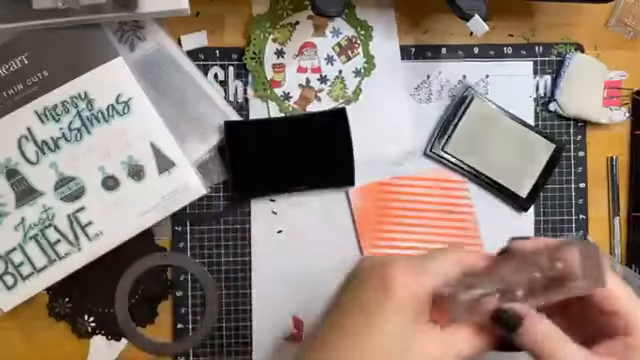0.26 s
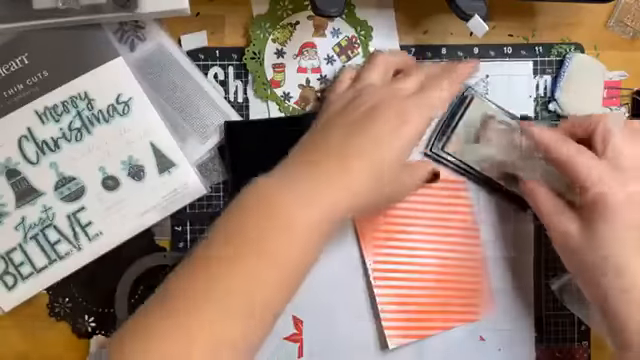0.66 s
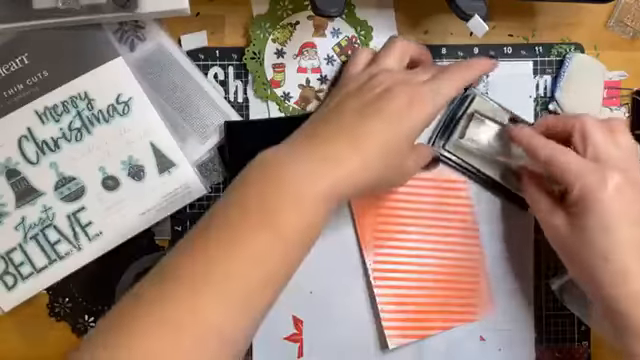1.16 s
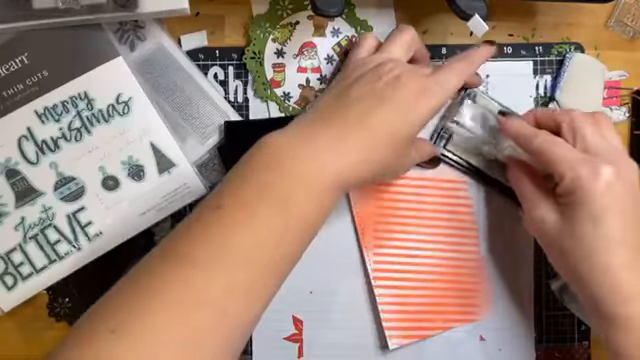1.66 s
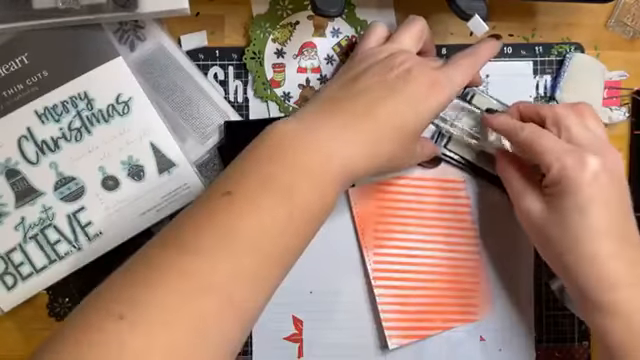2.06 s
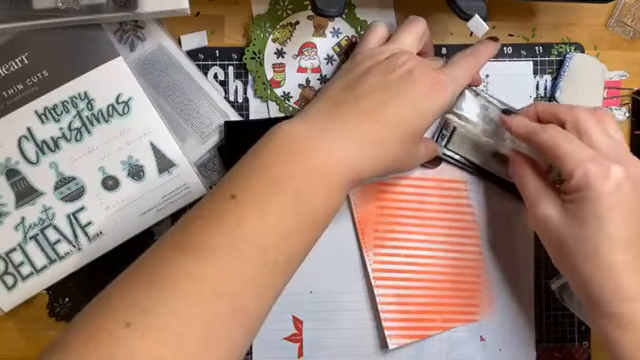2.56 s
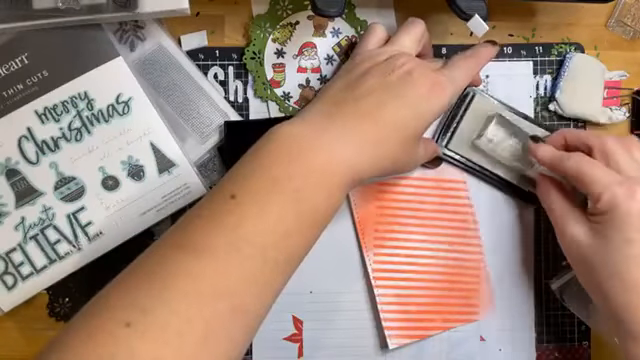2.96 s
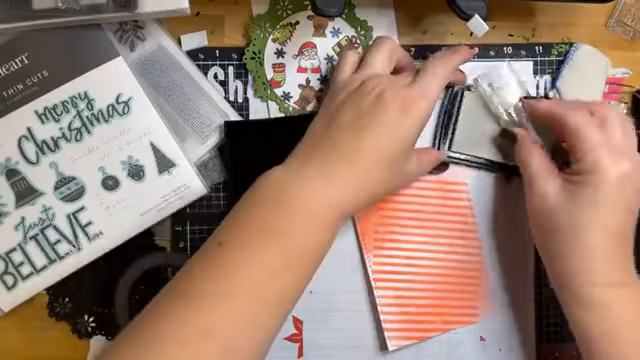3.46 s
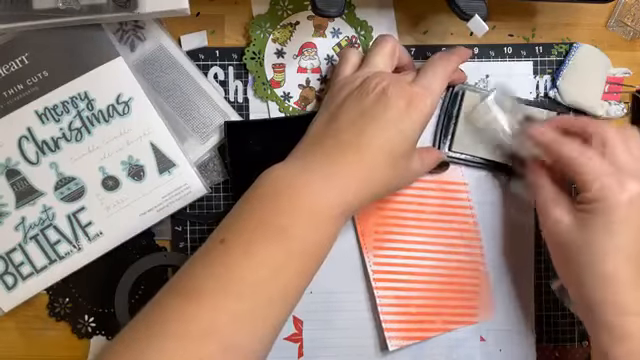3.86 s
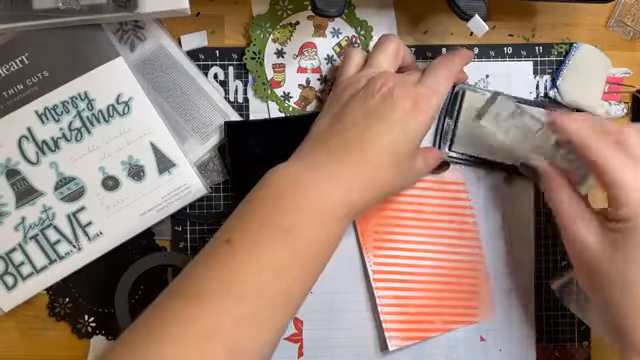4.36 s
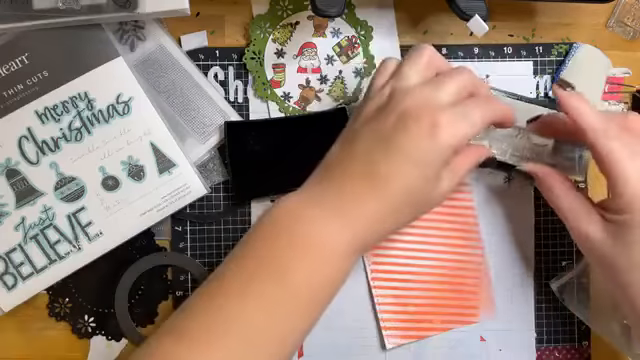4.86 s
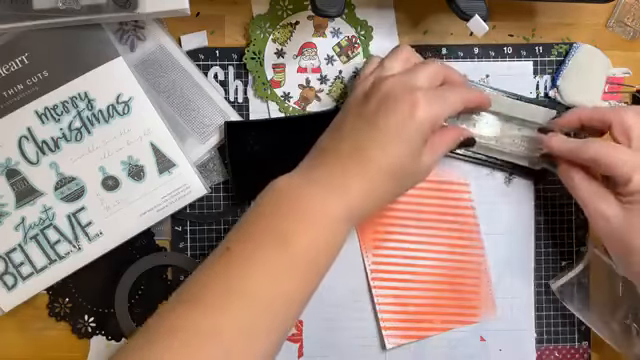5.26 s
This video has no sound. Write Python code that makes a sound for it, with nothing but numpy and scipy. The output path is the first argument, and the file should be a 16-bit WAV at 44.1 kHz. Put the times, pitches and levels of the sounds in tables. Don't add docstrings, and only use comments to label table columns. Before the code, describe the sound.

A fingernail or ring clinks on an acrylic block, hands rustle barely audibly, then the block is dabbed on an ink pad: a loud click, several muffled pressing thuds, then a livelier run of crisp taps with wooden knocks. A small microphone stands on the same table, picking up its boomy resonance and short indoor reflections. It ends in faint low room tone.

```python
import sys
import numpy as np
from scipy import signal
from scipy.io import wavfile
from scipy.ndimage import uniform_filter1d

SR = 44100
rng = np.random.default_rng(int(sys.argv[2]) if len(sys.argv) > 2 else 0)


def undo_db(level):
    steps = np.asarray(level, float) / 20
    return 10 ** steps


def persist_wave(psi):
    counts = np.round(np.clip(psi, -1, 1) * 32767).astype(np.int16)
    wavfile.write(sys.argv[1], SR, np.atleast_2d(counts).T)


N = 243640

# time in s, click in dB, brightness in dB, knock into the table top in dB.
TAPS = [(1.697, -16.5, -0.5, -31), (1.867, -25.5, 2, -37), (2.149, -46.5, -45, -54),
        (2.199, -55, -11, -49.5), (2.313, -50, -27, -51.5), (2.359, -76, -2, -53.5),
        (2.454, -56, -5, -53.5), (2.616, -33.5, -5.5, -45.5), (2.763, -36.5, -4.5, -44),
        (2.839, -46.5, -3, -43), (2.999, -46, -15, -49.5), (3.06, -44.5, -6, -50.5), (3.133, -50, -1, -47),
        (3.247, -26.5, -10, -42), (3.621, -58, 8, -54), (3.772, -23, 0, -36.5), (3.909, -19.5, -1.5, -31.5),
        (4.038, -31, -0.5, -43), (4.121, -52.5, -5, -49), (4.223, -22, 0.5, -36), (4.374, -33, -0.5, -49.5),
        (4.538, -23.5, -1.5, -38), (4.721, -50.5, -13, -62.5)]
# time in s, level in dB, upper mode against lower in dB, push in s.
THUMPS = [(0.029, -51.5, 10.5, 0.012), (0.12, -47, -27, 0.022), (1.689, -28.5, 11, 0.013),
          (1.79, -27.5, -1, 0.013), (1.88, -44, 24.5, 0.012), (1.911, -25.5, -23, 0.0072),
          (2.21, -20.5, -2.5, 0.015), (2.361, -20, -6, 0.015), (2.449, -43.5, -4, 0.0091),
          (2.518, -34.5, 5, 0.0159), (2.627, -37, -1.5, 0.0081), (2.682, -11.5, 0, 0.01636),
          (2.76, -54, 11, 0.0051), (2.848, -15, -3.5, 0.013), (3.006, -16, -2, 0.014),
          (3.071, -51, 2, 0.0036), (3.135, -20.5, -11.5, 0.011), (3.254, -27, 2, 0.012),
          (3.628, -26.5, 0.5, 0.015), (3.775, -28, -9.5, 0.0065), (3.911, -44, 13, 0.004),
          (3.965, -14.5, 4, 0.014), (4.04, -25, -2.5, 0.012), (4.125, -14, -10, 0.012),
          (4.227, -23, -6, 0.0094), (4.375, -32, -11.5, 0.0077), (4.545, -25.5, 5, 0.013),
          (4.731, -51, 9, 0.011), (4.984, -66, 17, 0.011), (5.441, -46, -6.5, 0.0083)]
# time in s, level in dB, knock through the hand in dB.
CLINKS = [
    (0, -75, -45.5),
    (0.033, -90, -42.5),
    (0.071, -68, -45.5),
    (.12, -20.5, -28),
]
# start in s, hold in s, level in dB.
SLIDES = [(0, 0.0092, -70.5), (0.136, 0.023, -58), (0.32, 0.14, -80), (0.563, 0.23, -88),
          (1.43, 0.022, -90), (2.013, 0.13, -80), (2.3, 0.023, -79), (2.603, 0.25, -77.5),
          (3.05, 0.021, -74), (3.224, .12, -80), (3.461, 0.13, -77), (3.759, 0.92, -74.5)]
# time in s, level in dB, pitch in Hz.
TICKS = [
    (0.641, -60, 5540),
    (0.828, -76.5, 1550),
    (1.052, -68, 1790),
    (1.421, -63.5, 2580),
    (5.282, -65.5, 4100),
]
# frequency in Hz, level in dB per Hz.
PEEL_SPECTRUM = [(240, -43), (400, -1.5), (626, -4), (708, -8), (801, -7), (2800, -8.5), (3810, -13),
                 (16000, -37)]
# frequency in Hz, level in dB per Hz.
CRACK_SPECTRUM = [(300, -45), (550, -9), (1000, -14), (1800, 4), (3000, -7), (4800, -5.5), (9500, -12),
                  (10500, -17.5), (16200, -20)]
# frequency in Hz, level in dB per Hz.
CLINK_SPECTRUM = [(410, -45), (700, -17), (853, 5), (1260, -14), (3480, -10), (4020, -12), (5890, -11),
                  (6630, -21.5), (16200, -26.5)]
# frequency in Hz, level in dB per Hz.
AIR_SPECTRUM = [(15, -44.5), (25, -16.5), (55, -24), (90, 2.5), (125, -2), (220, -5.5), (420, -14.5),
                (800, -29.5), (1500, -44.5), (3800, -21.5), (4300, -45.5), (9000, -39), (15500, -56)]
# frequency in Hz, width in Hz, level in dB.
CASE_MODES = [(856, 180, -16), (1055, 500, -5.5), (1398, 304, 11), (1600, 66, 4.5), (1990, 170, -6.5),
              (2700, 500, -9.5), (3993, 320, 5), (5320, 590, -3), (6740, 550, -0.5)]
# frequency in Hz, width in Hz, level in dB.
BLOCK_MODES = [(918, 73, -3.5), (2570, 200, -0.5), (3475, 47, -3.5), (3740, 74, -7), (5500, 460, -29),
               (7280, 120, -14.5), (8630, 300, -10)]
# frequency in Hz, width in Hz, level in dB.
TOP_MODES = [(178.8, 23, -4.5), (243.6, 22.6, 7), (311.5, 26.8, 10), (347, 41, 3), (383, 13.9, 0.5),
             (412, 14, -2.5), (473.6, 56, -11)]
# delay in s, level in dB.
ECHOES = [(0, 2), (.0045, -14), (.0114, -1), (.0158, -12), (.0228, -12.5), (0.029, -7.5)]
# frequency in Hz, time to fall 60 dB in s.
ROOM_DECAY = [(100, 0.69), (300, 0.26), (1000, 0.3), (4000, .3), (12000, 0.27)]
# frequency in Hz, gain in dB.
EDGE_ON = [(300, -3), (1200, -5.5), (2800, -4), (4000, 0.5), (16000, -1)]

LEAD_S = 0.02
GRIT_SAMPLES = 1536


def evened(x):
    return x / np.sqrt(np.mean(x ** 2) + 1e-20)


def read(points, hz):
    f, value = np.transpose(points)
    return np.interp(np.log(hz + 1), np.log(f + 1), value)


def colour(x, points):
    hz = np.abs(np.fft.fftfreq(4096, 1 / SR))
    log_gain = np.log(undo_db(np.maximum(read(points, hz), -90)))
    kernel = np.fft.ifft(np.exp(np.conj(signal.hilbert(log_gain)))).real[:2048]
    return signal.oaconvolve(x, kernel / np.linalg.norm(kernel))[:len(x)]


def ring(x, modes):
    t = np.arange(SR // 2) / SR
    kernel = sum(undo_db(db) * np.exp(-np.pi * width * t) * np.sin(2 * np.pi * hz * t)
                 for hz, width, db in modes)
    return signal.oaconvolve(x, kernel / abs(kernel).max())[:len(x)]


def add(mix, s, sound):
    part = mix[max(round(s * SR), 0):][:len(sound)]
    part += sound[:len(part)]


def push(s):
    shape = np.hanning(max(round(s * SR), 3) + 2)
    return -shape / shape.sum()


def stand(x, edge_hz):
    return signal.sosfilt(signal.butter(4, edge_hz, "high", fs=SR, output="sos"), x)


def late_field(tail_db):
    reflections = np.zeros(SR // 2)
    at = np.arange(300, SR // 2 - 20, 12)
    reflections[at + rng.integers(0, 12, len(at))] = rng.choice([-1., 1.], len(at))
    hz, t, z = signal.stft(reflections, SR, nperseg=256)
    rise = 1 - np.exp(-(t / 0.0058) ** 2)
    decay = undo_db(-60 * t / read(ROOM_DECAY, hz)[:, None])
    tail = signal.istft(z * rise * decay, SR, nperseg=256)[1]
    return undo_db(tail_db) * tail / np.linalg.norm(tail)


def room(x, tail_db):
    response = late_field(tail_db)
    for s, db in ECHOES:
        response[round(s * SR)] += undo_db(db)
    return signal.oaconvolve(x, response)[:N]


def air():
    frames, hz = N // 512 + 5, np.fft.rfftfreq(2048, 1 / SR)
    real, imag, patches = rng.standard_normal((frames, 1025, 3)).T
    patches = evened(uniform_filter1d(uniform_filter1d(patches, 30, 0), 12, 1))
    gain = undo_db(read(AIR_SPECTRUM, hz)[:, None] + 1.5 * patches)
    tone = signal.istft((real + 1j * imag) * gain, nperseg=2048, noverlap=1536)[1][:N]
    drone = ring(rng.standard_normal(N), [(120, 2.7, 0)])
    return undo_db(-68.5) * evened(tone) + undo_db(-69) * evened(drone)


def ticks():
    out, t = np.zeros(N), np.arange(600) / SR
    onset = np.hanning(40)[np.minimum(np.arange(len(t)), 19)]
    for s, db, hz in TICKS:
        add(out, s, undo_db(db) * onset * np.exp(-0.3 * hz * t) * np.sin(2 * np.pi * hz * t))
    return room(out, 6.9)


def peel():
    rise_s, fall_db_per_s = 0.04, 133
    t = np.arange(N) / SR
    level = np.full(N, undo_db(-84.5))
    for s, hold, db in SLIDES:
        swell = np.clip(1 + (t - s) / rise_s, 0, 1)
        level += swell * undo_db(db - fall_db_per_s * np.maximum(t - s - hold, 0))
    sizes = undo_db(3.57 * np.minimum(rng.exponential(1, N), 5))
    snaps = rng.standard_normal(N) * sizes * (rng.random(N) < 4000 / SR)
    return room(level * evened(colour(snaps, PEEL_SPECTRUM)), 0)


def strike(db, contact_s, body, tail, grit, facing=((100, 0), (16000, 0))):
    t = np.arange(grit.shape[1]) / SR - LEAD_S
    landing = np.exp(-np.abs(t) / np.where(t < 0, 0.0005, max(contact_s, 1e-4)))
    landing += undo_db(-27.5) * np.exp(t / 0.0062) * (t < 0)
    uneven = 0.69 * grit[0] * landing / np.linalg.norm(grit[0] * landing)
    uneven[round(LEAD_S * SR)] += 1
    sound = signal.oaconvolve(tail, uneven)[:len(tail)]
    for (s, echo_db), g in zip(ECHOES, grit):
        burst = g * landing / np.linalg.norm(g * landing)
        if s == 0:
            burst = colour(burst, facing)
        add(sound, s, undo_db(echo_db) * burst)
    sound = body(sound)
    loudest = sound[round(LEAD_S * SR):round((LEAD_S + 0.05) * SR)]
    return undo_db(db - 14.5) * sound / np.std(loudest)


def clinks():
    out, knock, tail = np.zeros(N), np.zeros(N), late_field(1.5)
    grits = rng.standard_normal((len(CLINKS), len(ECHOES), GRIT_SAMPLES))

    def body(x):
        return evened(colour(x, CLINK_SPECTRUM)) + 0.97 * evened(ring(x, BLOCK_MODES))

    for (s, db, knock_db), grit in zip(CLINKS, grits):
        add(out, s + 0.00093 - LEAD_S, strike(db + 2, 0.0043, body, tail, grit))
        add(knock, s + 0.0018, undo_db(knock_db) * push(0.00049))
    knock = stand(ring(knock, [(217, 130, 3.0), (323, 140, 3.5), (452, 82, -6.0)]), 129)
    return out + knock + undo_db(-9.0) * room(knock, 2.5)


def thumps():
    low, high = np.zeros(N), np.zeros(N)
    for s, db, upper_db, push_s in THUMPS:
        add(low, s, undo_db(db - 5) * push(push_s))
        add(high, s, undo_db(db + upper_db + 6.5) * push(push_s))
    table = ring(low, [(100, 8.5, 0)]) + ring(high, [(123.5, 7.26, 0)])
    return stand(stand(table, 97), 55)


def tap_click(s_db, bright_db, grip, tail, grit):
    hollow_db = min(0.26 * (-16 - s_db), 9.5)
    case = [(hz * (1 + 0.02 * shift), width + 110, db + 2.16 * change)
            for (hz, width, db), (shift, change) in zip(CASE_MODES, grip)]
    tilt = [(500, hollow_db), (1500, hollow_db), (3000, 0), (5000, 0), (15000, bright_db)]

    def body(x):
        return colour(evened(colour(x, CRACK_SPECTRUM)) + 0.99 * evened(ring(x, case)), tilt)

    return strike(s_db, 0.0024, body, tail, grit, EDGE_ON)


def tap_knock(knock_db, spots):
    modes = [(hz, width, db + 4.8 * spot) for (hz, width, db), spot in zip(TOP_MODES, spots)]
    push_s = 0.0014 + 0.00006 * (-28.5 - knock_db)
    return undo_db(knock_db + 10.5) * ring(np.pad(push(push_s), (0, SR // 3)), modes)


def taps():
    click, knock = np.zeros(N), np.zeros(N)
    tails = [late_field(2.2) for _ in range(4)]
    grits = rng.standard_normal((len(TAPS), len(ECHOES), GRIT_SAMPLES))
    spots = rng.standard_normal((len(TAPS), len(TOP_MODES)))
    grips = rng.standard_normal((len(TAPS), len(CASE_MODES), 2))
    for k, (s, db, bright_db, knock_db) in enumerate(TAPS):
        hit = tap_click(db, bright_db, grips[k], tails[k % len(tails)], grits[k])
        add(click, s + 0.0006 - LEAD_S, hit)
        add(knock, s + 0.00289, tap_knock(knock_db, spots[k]))
    knock = signal.sosfilt(signal.butter(4, 520, fs=SR, output="sos"), stand(knock, 130))
    return click + knock + undo_db(-5.0) * room(knock, 0)


def scene():
    return (air() + ticks() + peel() + clinks() + thumps() + taps())[None]


def roll_off(x):
    return signal.sosfilt(signal.butter(12, 16830, fs=SR, output="sos"), x)


def record(dry):
    bass_cut = signal.butter(2, 50, "high", fs=SR, output="sos")
    band_limit = signal.firwin(511, 16250, window=("kaiser", 9), fs=SR)
    heard = signal.oaconvolve(signal.sosfilt(bass_cut, dry), band_limit[None], "same")
    heard = 0.2 * np.tanh(heard / 0.2)
    return roll_off(heard)


dry = scene()
out = record(dry)
persist_wave(out)
```